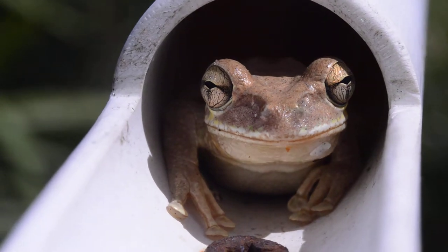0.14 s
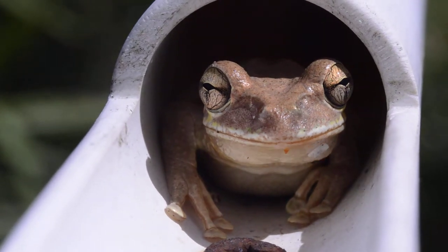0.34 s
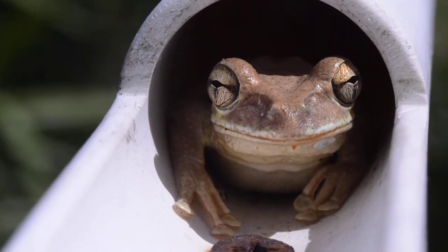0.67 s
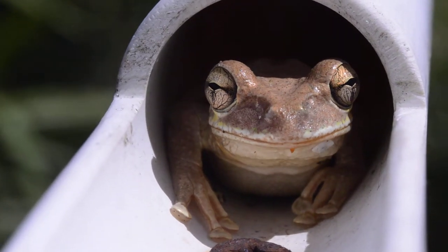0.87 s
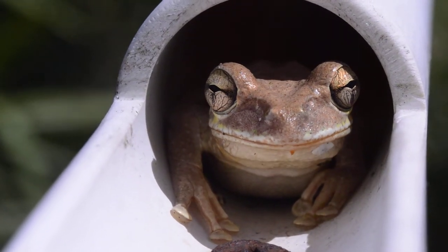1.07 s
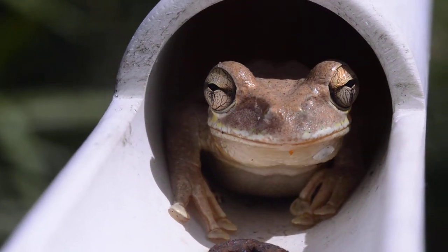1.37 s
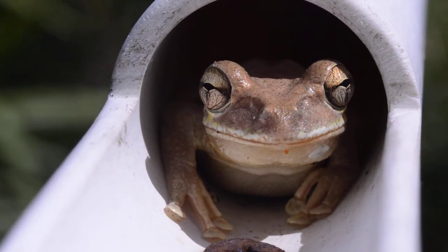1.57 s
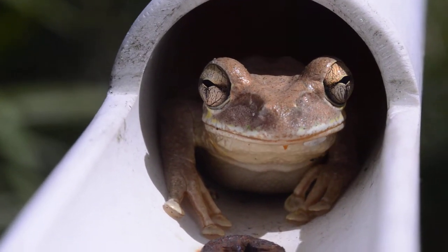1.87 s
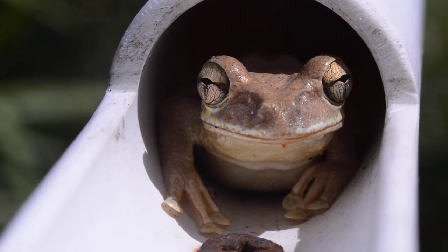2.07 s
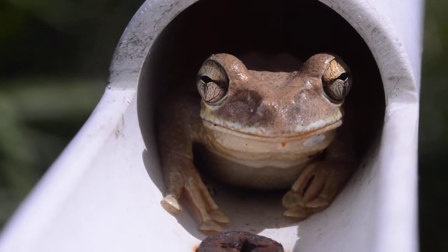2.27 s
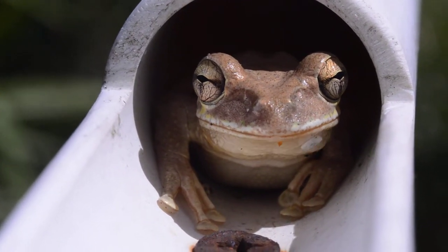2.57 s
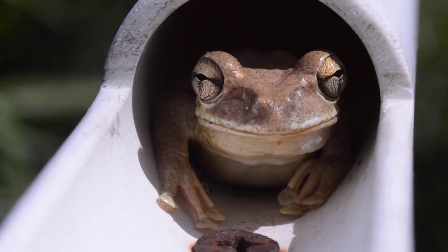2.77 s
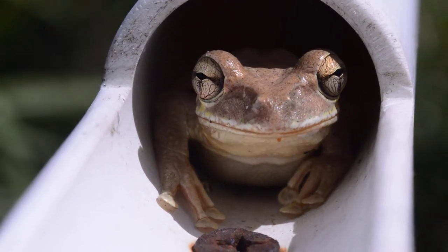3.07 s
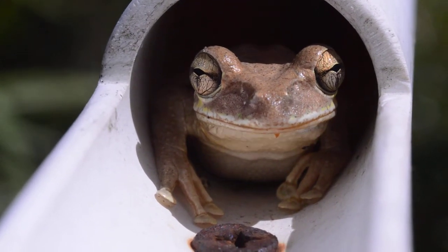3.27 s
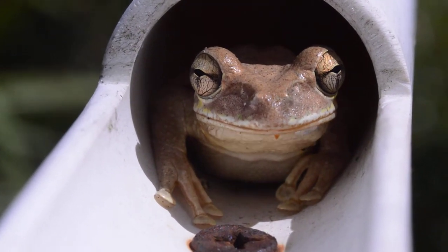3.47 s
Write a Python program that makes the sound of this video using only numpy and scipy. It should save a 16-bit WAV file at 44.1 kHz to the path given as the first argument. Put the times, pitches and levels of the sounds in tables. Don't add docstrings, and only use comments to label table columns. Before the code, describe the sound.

A cicada close by buzzes in a steady, piercing, very high rattling drone over faint distant traffic.

```python
import sys
import numpy as np
from scipy import signal
from scipy.io import wavfile
from scipy.ndimage import uniform_filter1d

SR = 44100
rng = np.random.default_rng(int(sys.argv[2]) if len(sys.argv) > 2 else 0)


def gain_from_db(level_db):
    decades = np.asarray(level_db, float) / 20
    return 10 ** decades


def unload_audio(sound):
    columns = np.transpose(np.atleast_2d(sound))
    steps = np.round(np.clip(columns, -1, 1) * 32767)
    wavfile.write(sys.argv[1], SR, steps.astype(np.int16))


N = 160524


def evened(x):
    return x / np.sqrt(np.mean(x ** 2) + 1e-20)


def along(points, t, column=1):
    table = np.array(points)
    return np.interp(t, table[:, 0], table[:, column])


def add(mix, start_s, sound):
    part = mix[round(start_s * SR):][:len(sound)]
    part += sound[:len(part)]


def wobble(rate_hz, t):
    rates = np.geomspace(rate_hz / 10, rate_hz, 20)
    return evened(sum(np.sin(2 * np.pi * (f * t + rng.random())) / np.sqrt(f) for f in rates))


def fuzzy(hz, width_hz, size=N):
    r = np.exp(-np.pi * width_hz / SR)
    turn = np.exp(2j * np.pi * hz * np.arange(size) / SR)
    low = signal.lfilter([1], [1, -2 * r, r * r], rng.standard_normal(size) / turn)
    return evened((low * turn).real)


def hiss(points, patchy_db):
    frames = N // 256 + 5
    hz = np.fft.rfftfreq(1024, 1 / SR)
    a, b, patches = rng.standard_normal((frames, 513, 3)).T
    patches = uniform_filter1d(patches, size=10, axis=0)
    patches = evened(uniform_filter1d(patches, size=12, axis=1))
    f, db = np.transpose(points)
    shape_db = np.interp(np.log(hz + 1), np.log(f + 1), db)[:, None]
    spectra = (a + 1j * b) * gain_from_db(shape_db + patchy_db * patches)
    return evened(signal.istft(spectra, nperseg=1024, noverlap=768)[1][:N])


# t/s, length/s, level change/dB
LEAF_SHADES = [(0.447, .05, -2), (0.65, 0.054, -2), (1.513, 0.043, -1), (2.86, .025, -1.5),
               (2.97, 0.047, -4.5), (3.056, .03, 3), (3.113, 0.021, -3.5), (3.21, 0.026, -1.5),
               (3.324, 0.028, -2.5)]


def shade_db(t):
    return sum(db * np.exp(-.5 * ((t - s) / (0.46 * length)) ** 2) for s, length, db in LEAF_SHADES)


RISE_MS, GLIDE = .135, .08


def rings(times_s, gains, hz, ring_ms, rise_ms=RISE_MS):
    at = np.floor(times_s * SR).astype(int)[:, None] + np.arange(-40, 160)
    ms = 1000 * (at / SR - times_s[:, None])
    shape = np.where(ms < 0, np.exp(-.5 * (ms / rise_ms) ** 2), 1 / np.cosh(ms / ring_ms))
    cycles = hz * ms / 1000 * (1 + GLIDE * np.tanh(ms / 2))
    wave = gains[:, None] * shape * np.cos(2 * np.pi * cycles)
    ok = (at >= 0) & (at < N)
    return np.bincount(at[ok], wave[ok], N)


BEAT_HZ, BEAT_JITTER_US, BEAT_SPREAD_DB = 102.1, 85, .4
# t/s, lag/cycle
BEAT_LAG = [(0, .4), (.3, .43), (.5, .49), (.6, .51), (.9, .55), (1.1, .56), (1.4, .5), (1.8, .535),
            (2.3, .47), (2.7, .395), (2.9, .335), (3.2, .29), (3.64, .29)]
# delay/ms, f/Hz, level/dB, ring/ms, wander/us
RIBS = [
    (0, 10300, 0, .18, 1),
    (.74, 10600, -15, .15, 12),
    (1.272, 9480, -3.5, .36, 5),
    (2.219, 10300, -2.8, .2, 10),
    (3.392, 9400, -6.2, .28, 20),
    (4.08, 9400, -11, .3, 28),
    (5.06, 10700, -9, .1, 30),
]
RIB_SPREAD_DB = .8
RIB_OVERTONES = [-16, -8, -15, -16, -10, -13, -10]
OVERTONE_HZ, OVERTONE_RISE_MS, OVERTONE_RING_MS = 12350, .085, .095
OVERTONE_LEAD_MS, OVERTONE_WANDER_US = .18, 8
# t/s, level/dB
EARLY_POP = [(0, -24), (.3, -17), (.6, -22), (2.5, -20), (2.6, -10), (3.2, -10), (3.3, -22), (3.64, -16)]
EARLY_MS, EARLY_HZ, EARLY_RING_MS = -1.7, 10000, 0.32


def drum_strokes():
    k = np.arange(-1, int(N / SR * BEAT_HZ) + 1)
    chance = rng.standard_normal((len(k), 2 * len(RIBS) + 4))
    beat = (k + along(BEAT_LAG, k / BEAT_HZ)) / BEAT_HZ + 1e-6 * BEAT_JITTER_US * chance[:, 0]
    level = gain_from_db(BEAT_SPREAD_DB * chance[:, 1])
    treble = gain_from_db(along(SINGER, beat, column=2) + 18.5 + .8 * shade_db(beat))
    early = beat + EARLY_MS / 1000 + 4e-5 * chance[:, 2]
    out = rings(early, gain_from_db(along(EARLY_POP, beat)), EARLY_HZ, EARLY_RING_MS)
    for j, (delay_ms, hz, db, ring_ms, wander_us) in enumerate(RIBS):
        drift = evened(uniform_filter1d(chance[:, 4 + 2 * j], size=3))
        pop = beat + delay_ms / 1000 + 1e-6 * wander_us * drift
        gain = level * gain_from_db(db + RIB_SPREAD_DB * chance[:, 5 + 2 * j])
        out += rings(pop, gain, hz, ring_ms)
        overtone = pop - OVERTONE_LEAD_MS / 1000 + 1e-6 * OVERTONE_WANDER_US * np.roll(drift, j + 3)
        out += rings(overtone, gain * treble * gain_from_db(RIB_OVERTONES[j]),
                     OVERTONE_HZ, OVERTONE_RING_MS, OVERTONE_RISE_MS)
    return out


SCATTER_DB, SCATTER_T60_S = -15, .03


def leaf_scatter(song):
    t = np.arange(N) / SR
    tails = rng.standard_normal((2, 3000)) * gain_from_db(-60 * t[:3000] / SCATTER_T60_S)
    sway = 2.7 * wobble(3.6, t)
    out = np.zeros(N)
    for weight, tail in zip((np.cos(sway), np.sin(sway)), tails):
        out += signal.oaconvolve(song * weight, tail / np.linalg.norm(tail))[:N]
    return gain_from_db(SCATTER_DB) * out


# t/s, level/dB, treble/dB
SINGER = [(0.0, -32, -15), (0.02, -30.5, -16), (0.25, -33.5, -19), (0.35, -27.5, -20), (0.71, -32, -18),
          (0.78, -28.5, -18), (0.87, -30, -16), (1.35, -27.5, -19), (1.63, -29.5, -17), (1.73, -26.5, -16),
          (1.94, -31, -17), (2.11, -29.5, -21), (2.43, -31, -16), (2.74, -29, -20.5), (3.43, -30, -21),
          (3.48, -36, -13), (3.6, -32, -25), (3.64, -29.5, -15)]


def cicada():
    t = np.arange(N) / SR
    song = drum_strokes()
    return evened(song + leaf_scatter(song)) * gain_from_db(along(SINGER, t) + 0.21 + shade_db(t))


# f/Hz, density/dB per Hz
CHORUS = [(6000, -31), (7300, -35), (7900, 2.5), (9000, -4.5), (10000, 0.5), (11500, -2), (12500, -20),
          (14500, -32), (16000, -30)]
CHORUS_DB = -40.5
# f/Hz, width/Hz, level/dB
CHORUS_LINES = [
    (8030, 60, -52),
    (8568, 35, -51),
    (8712, 60, -54),
    (9420, 120, -43),
]


def chorus():
    t = np.arange(N) / SR
    lines = sum(gain_from_db(db + 1.2 * wobble(2.74, t)) * fuzzy(hz, width) for hz, width, db in CHORUS_LINES)
    return gain_from_db(CHORUS_DB) * hiss(CHORUS, patchy_db=1.2) + lines


# t/s, level/dB
TRAFFIC_SWELL = [(0.0, -48), (0.04, -49.5), (0.77, -42), (0.84, -36.5), (0.87, -39), (1.32, -43),
                 (1.35, -45), (1.84, -49), (2.96, -40), (3.23, -37), (3.6, -38), (3.64, -37)]
# f/Hz, width/Hz, level/dB, share of swell
ENGINE_DRONE = [
    (118.8, 29, -4, 0.58),
    (240.9, 56.5, -2.5, 1.1),
    (358.5, 83, -5.5, 1.39),
    (499.6, 56, -20.5, 1.45),
]
# t/s, f/Hz, width/Hz, level/dB
LATE_ENGINE = (3.5, 580, 160, -44.5)
# f/Hz, density/dB per Hz
AIR = [(12, -38), (25, -28), (62, -21.5), (105, 2.5), (170, -5), (650, -4.5), (1600, -17), (3610, -27),
       (5750, -30.5), (7000, -28.5), (9100, -59)]
AIR_DB = -42


def traffic():
    t = np.arange(N) / SR
    swell_db = along(TRAFFIC_SWELL, t) + 46
    drone = sum(gain_from_db(db - 47.5 + share * swell_db) * fuzzy(hz, width)
                for hz, width, db, share in ENGINE_DRONE)
    start_s, hz, width, db = LATE_ENGINE
    fade_in = np.clip((t - start_s) / 0.11, 0, 1)
    drone += gain_from_db(db) * fade_in * fuzzy(hz, width)
    return gain_from_db(AIR_DB - 1.5 + 0.05 * swell_db) * hiss(AIR, patchy_db=1.09) + drone


# t/s, peak/dB
TICKS = [
    (0.2339, -37),
    (0.4748, -37),
    (0.658, -44),
    (0.8624, -35.5),
    (1.4217, -39),
    (1.7085, -46),
    (1.8497, -46),
]
# f/Hz, level/dB, T60/s
TICK_MODES = [(1250, 3.5, .011), (1600, 3, .010), (1950, 0, .008), (2420, 1.5, .014), (3300, -12, .006)]


def ticks():
    out, t = np.zeros(N), np.arange(900) / SR
    for s, peak_db in TICKS:
        ring = sum(gain_from_db(db - 60 * t / t60) * np.sin(2 * np.pi * hz * rng.uniform(.96, 1.04) * t)
                   for hz, db, t60 in TICK_MODES)
        add(out, s, gain_from_db(peak_db + 3) * np.minimum(t / .001, 1) * ring)
    return out


# t/s, length/s, level/dB, f/Hz, width/Hz
CHATTER = [
    (.29, .18, -64, 4120, 150),
    (.46, .11, -66, 4200, 150),
    (.993, .05, -60, 3700, 450),
    (1.41, .11, -58, 3100, 500),
    (1.37, .14, -64, 3800, 300),
]


def chatter():
    out = np.zeros(N)
    for s, length, db, hz, width in CHATTER:
        t = np.arange(0, length, 1 / SR)
        swell = np.sqrt(np.sin(np.pi * t / length))
        flutter = 1 + 0.83 * np.sin(2 * np.pi * 70 * t)
        add(out, s, gain_from_db(db) * swell * flutter * fuzzy(hz, width, size=len(t)))
    return out


# t/s, length/s, level/dB, start f/Hz, end f/Hz
WHISTLES = [
    (.685, .09, -63, 3750, 2650),
    (.988, .062, -59, 3450, 2650),
    (1.312, .075, -62.5, 3450, 2600),
]


def whistles():
    out = np.zeros(N)
    for s, length, db, start_hz, end_hz in WHISTLES:
        u = np.arange(0, length, 1 / SR) / length
        phase = 2 * np.pi * np.cumsum(start_hz + (end_hz - start_hz) * u) / SR
        note = np.sin(np.pi * u ** 1.4) ** .4 * np.sin(phase)
        echo = 0.064 * rng.standard_normal(3000) * gain_from_db(-60 * np.arange(3000) / SR / 0.18)
        echo[0] = 1
        add(out, s, gain_from_db(db + 3) * np.convolve(note, echo))
    return out


# centre t/s, half length/s, f/Hz, level/dB
GUSTS = [
    (1.63, .045, 33, -53),
    (1.86, .075, 36, -53),
    (1.93, .05, 25, -54),
    (1.98, .04, 50, -48),
    (1.23, .04, 32, -57),
]


def gusts():
    out = np.zeros(N)
    for s, length, hz, db in GUSTS:
        t = np.arange(0, length * 2, 1 / SR)
        add(out, s - length, gain_from_db(db + 6.5) * np.hanning(len(t)) * np.sin(2 * np.pi * hz * t))
    return out


# t/s, level/dB, f/Hz
SNAPS = [
    (2.9865, -33, 1950),
    (1.671, -45, 3500),
]


def snaps():
    out, t = np.zeros(N), np.arange(900) / SR
    for s, db, hz in SNAPS:
        tone = .25 * gain_from_db(-60 * t / .03) * np.sin(2 * np.pi * hz * t)
        crack = sum((-1) ** j * np.sin(2 * np.pi * hz * ratio * t) / (1 + ratio * ratio)
                    for j, ratio in enumerate((.5, .75, 1.35, 1.7, 2.1, 2.8)))
        add(out, s, gain_from_db(db) * (tone + gain_from_db(-60 * t / .012) * crack))
    return out


def scene():
    steady = cicada() + chorus() + traffic()
    return (steady + ticks() + chatter() + whistles() + gusts() + snaps())[None]


def low_pass(x):
    return signal.sosfilt(signal.butter(12, 15980, fs=SR, output="sos"), x)


def record(dry):
    lowpass = signal.firwin(1023, 15810, window=("kaiser", 9), fs=SR)
    limited = signal.oaconvolve(dry, lowpass[None], "same")
    return low_pass(limited)


dry = scene()
out = record(dry)
unload_audio(out)
```